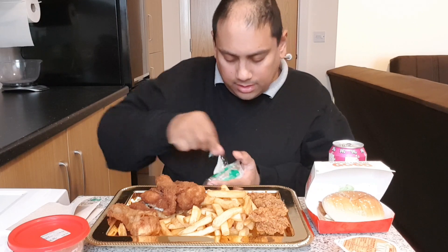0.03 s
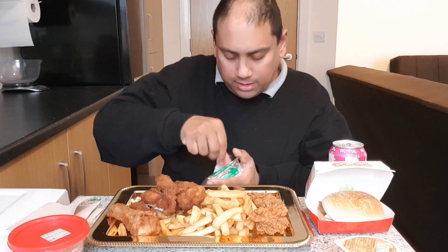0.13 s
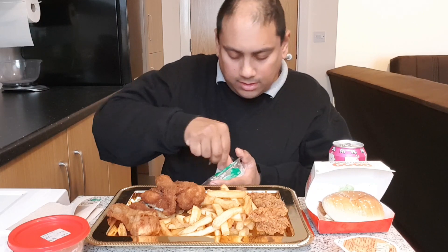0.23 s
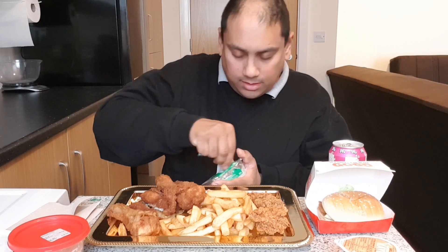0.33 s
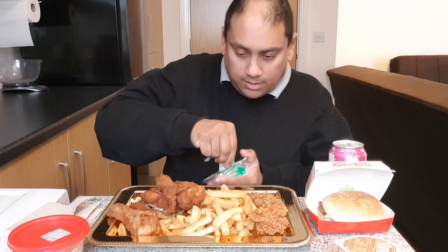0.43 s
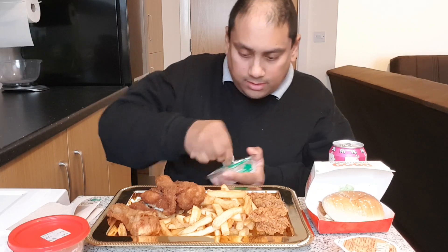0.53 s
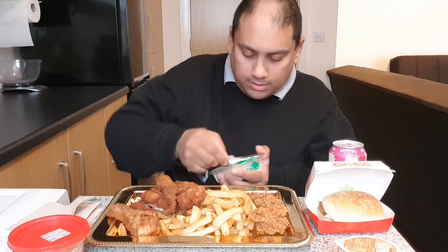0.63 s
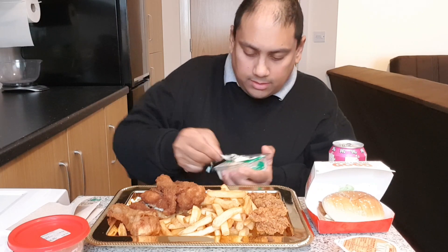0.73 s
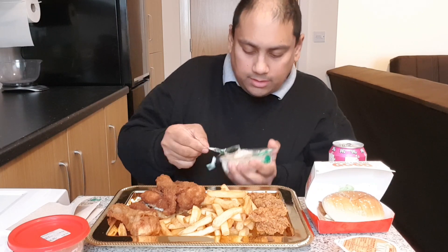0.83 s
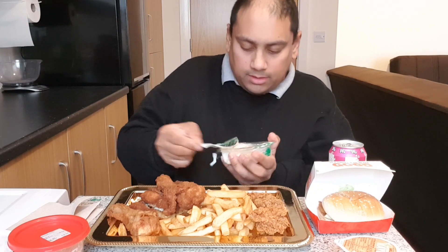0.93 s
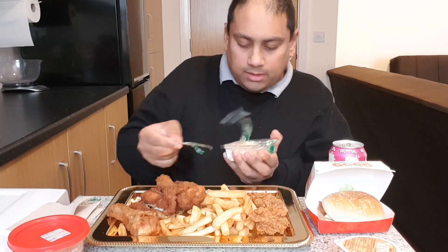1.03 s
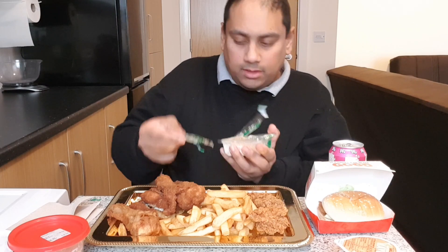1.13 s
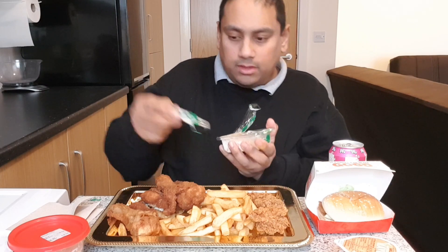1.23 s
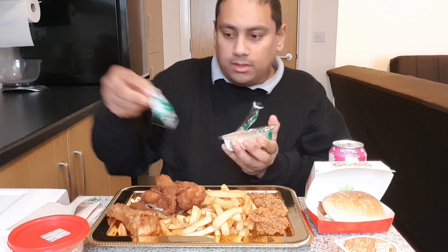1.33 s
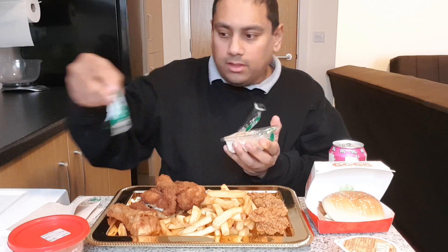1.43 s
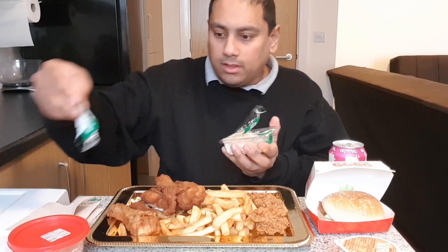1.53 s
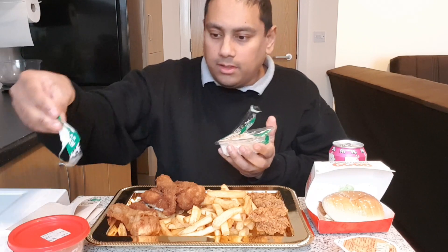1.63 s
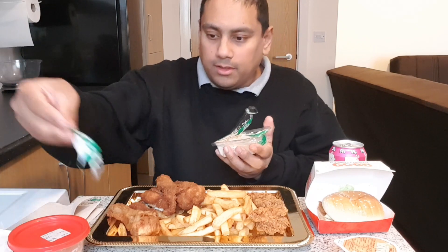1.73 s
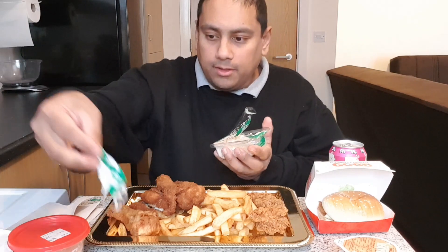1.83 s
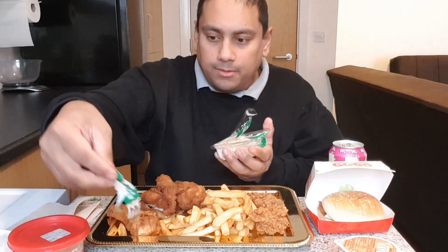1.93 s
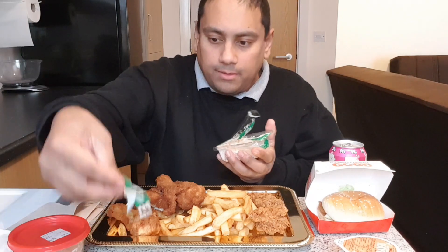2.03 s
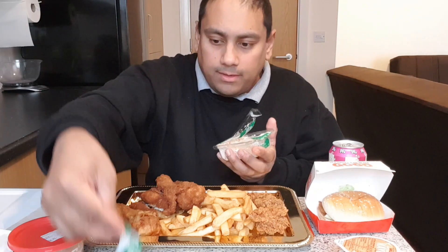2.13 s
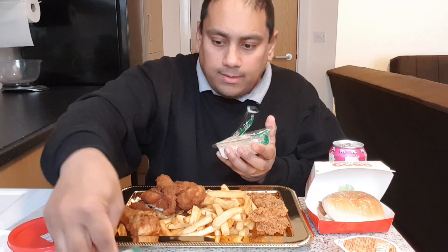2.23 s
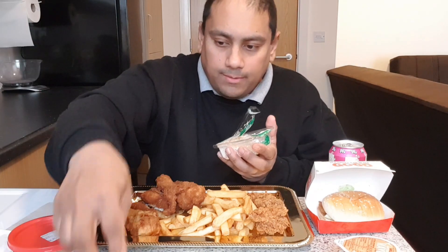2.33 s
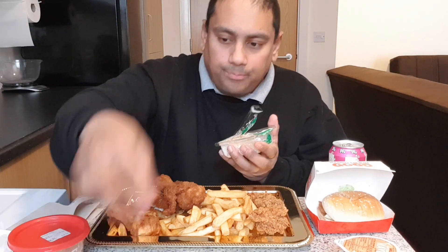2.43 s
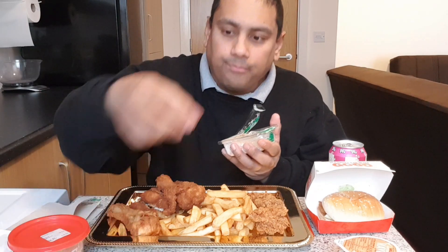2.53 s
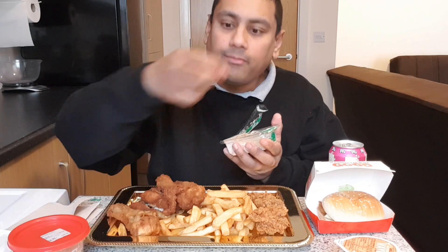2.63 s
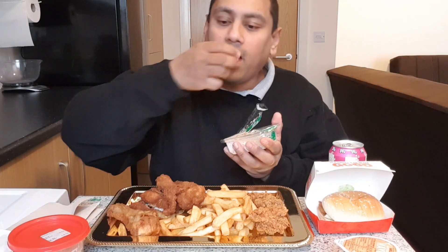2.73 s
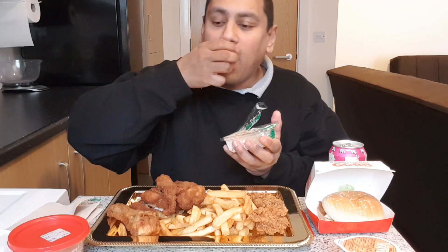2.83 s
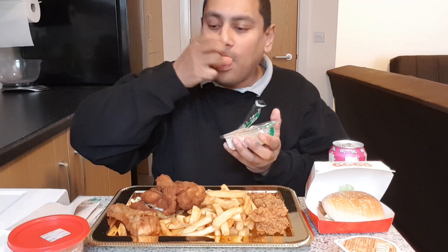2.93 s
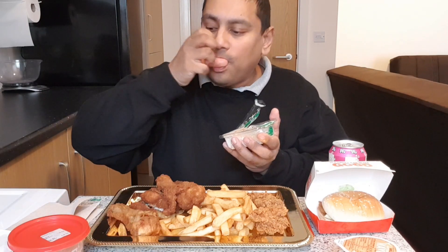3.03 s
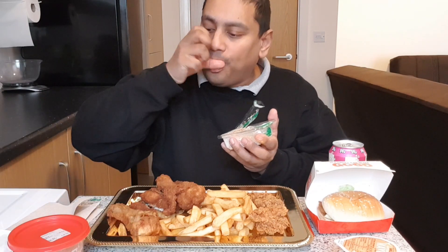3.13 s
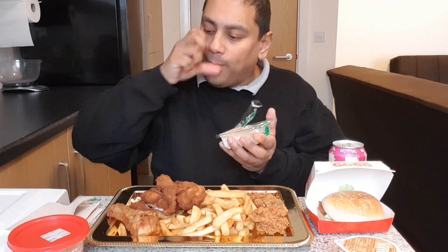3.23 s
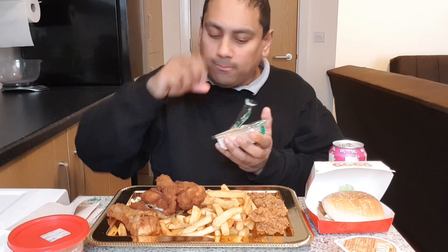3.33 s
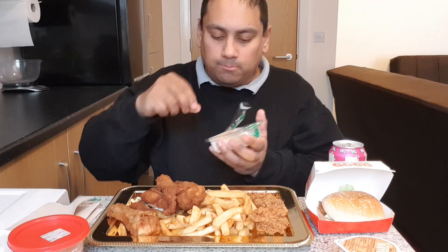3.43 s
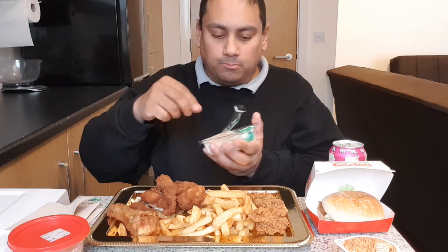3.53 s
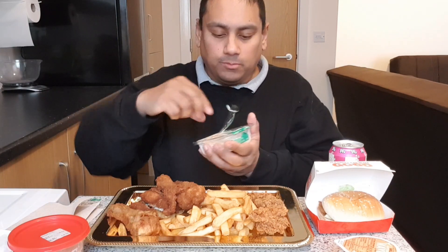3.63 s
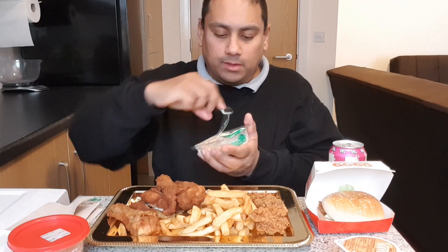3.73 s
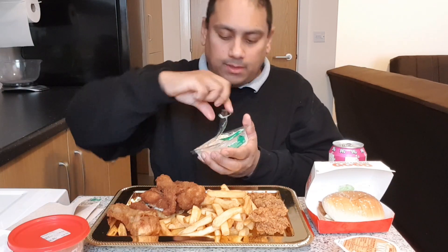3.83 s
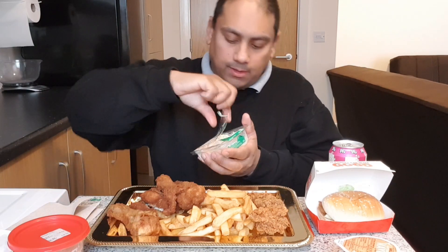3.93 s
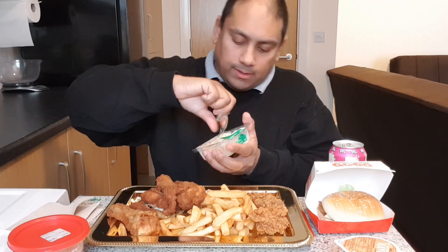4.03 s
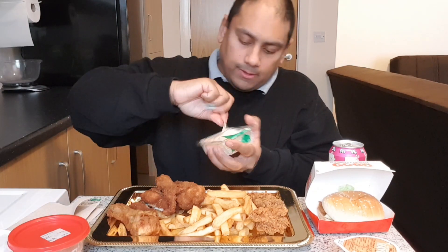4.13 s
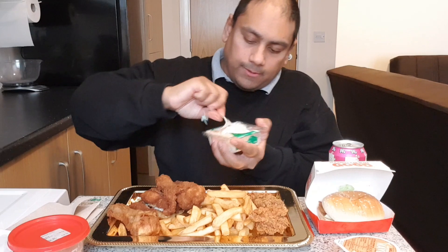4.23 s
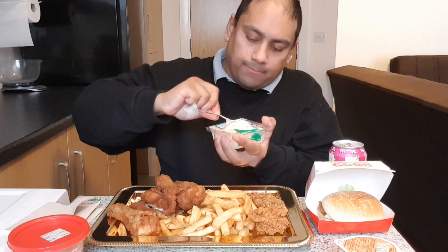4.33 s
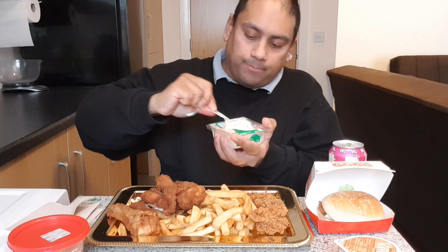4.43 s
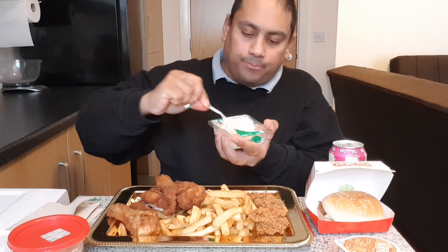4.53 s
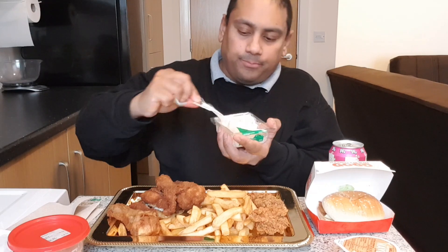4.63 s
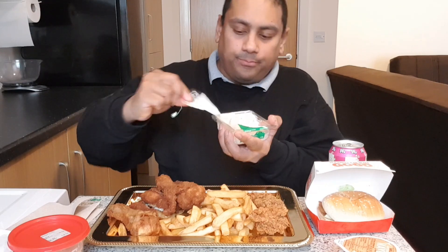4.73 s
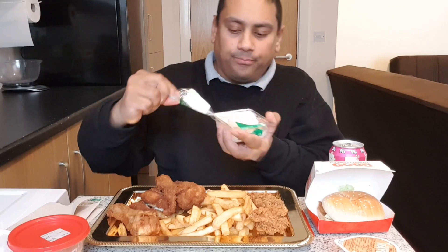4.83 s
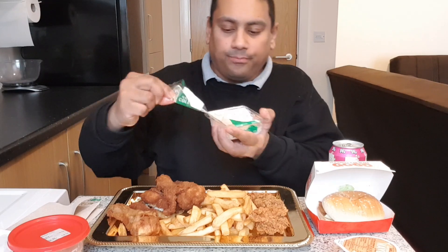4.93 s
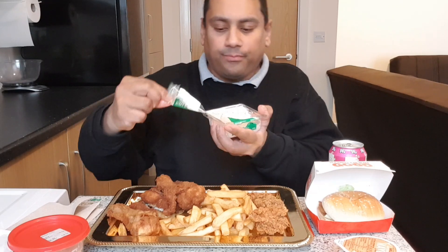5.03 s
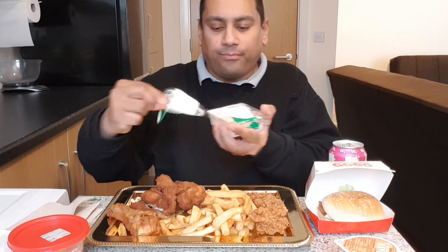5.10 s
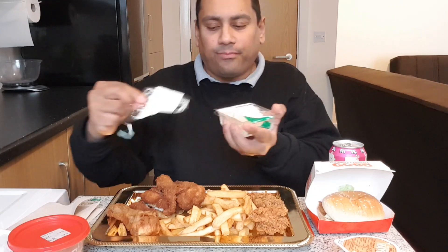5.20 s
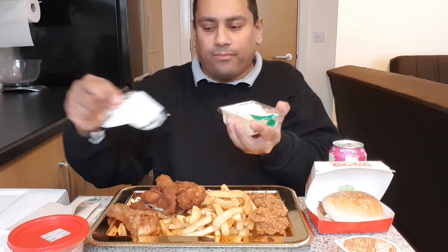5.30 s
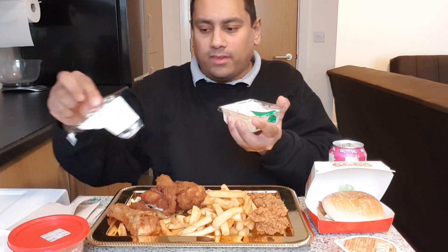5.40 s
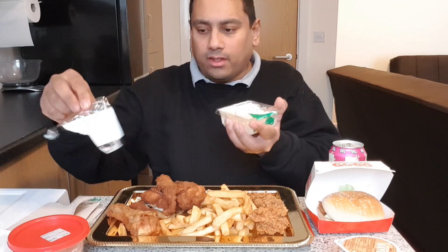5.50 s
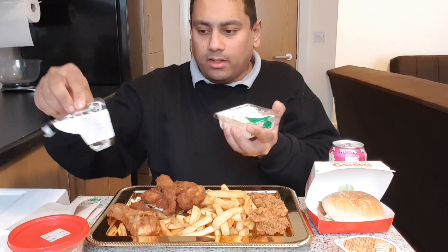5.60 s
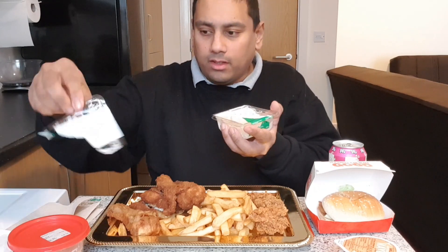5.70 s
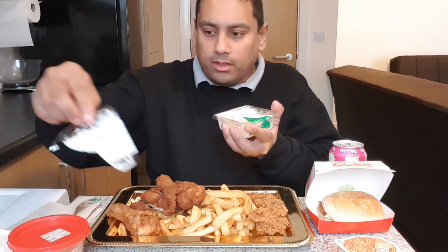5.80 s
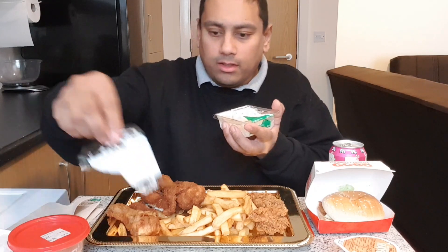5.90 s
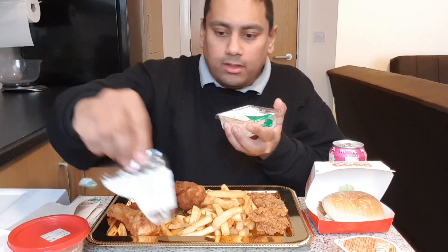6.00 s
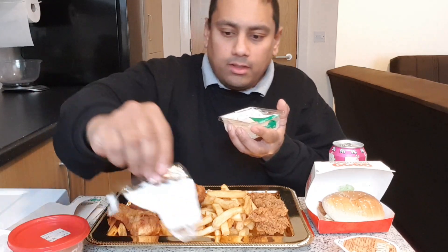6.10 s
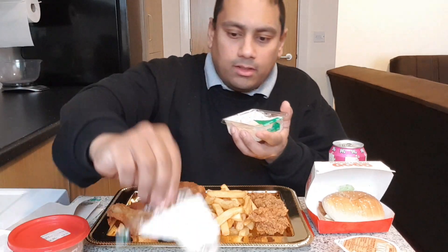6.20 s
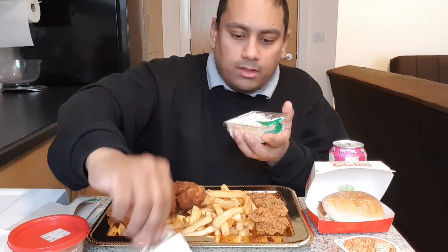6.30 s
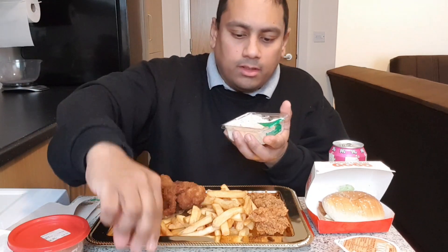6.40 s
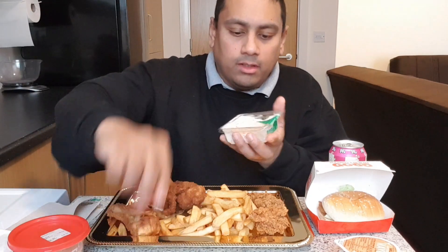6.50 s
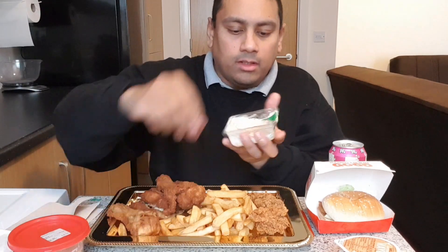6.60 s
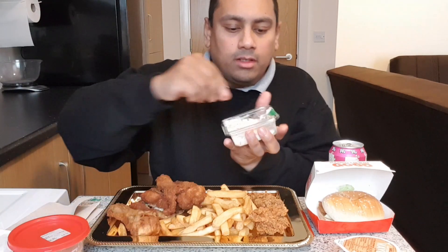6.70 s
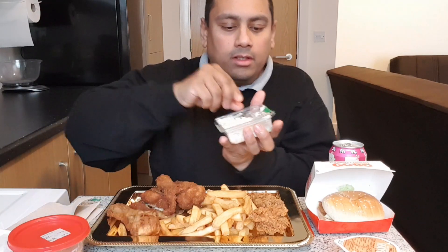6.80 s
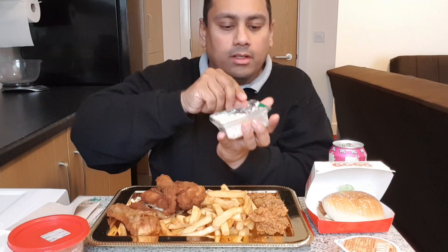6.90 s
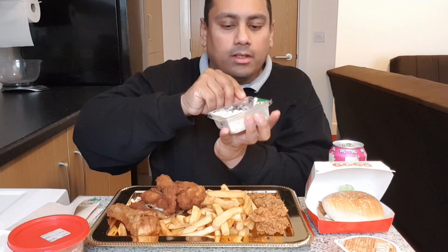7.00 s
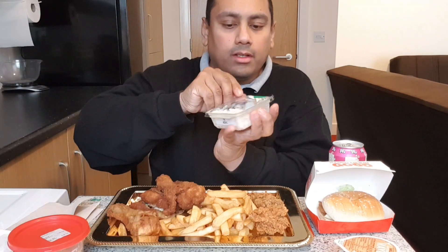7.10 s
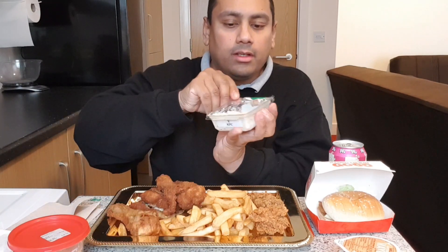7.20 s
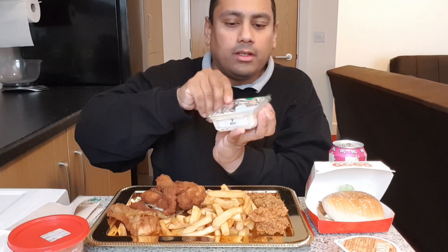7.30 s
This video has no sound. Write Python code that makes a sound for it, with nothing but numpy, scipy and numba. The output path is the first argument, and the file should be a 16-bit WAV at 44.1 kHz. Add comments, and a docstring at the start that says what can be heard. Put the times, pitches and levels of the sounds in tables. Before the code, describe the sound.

From the start until about 1 second, a strip of film lid is tugged off a small plastic dip tub, the seal giving in tiny cracks and a few sharp snaps that make the tub ring briefly. The loose strip crinkles in short bursts from 1.2 to 2 seconds. At about 2.2 seconds a hand bumps the table softly. Quiet wet smacks of a finger being licked come around 2.7 and 3.1 seconds. From 4 to 5 seconds the rest of the lid peels away in a brighter run of crackles and snaps. The freed film crinkles and ticks until it is laid down at about 6.3 seconds. Near 7 seconds the tub is handled faintly. Everything sounds fairly close, in a small echoing kitchen with a steady low hum and faint hiss.

```python
"""The film lid of a small plastic dip tub is peeled off in two pulls: first a strip, then the rest.
The seal gives way in many tiny cracks and a few snaps, which make the tub and the tight film ring.
The loose pieces crinkle and are laid down. Between the pulls, a hand bumps the kitchen table
and a finger is licked. A small, echoing room with a low hum surrounds it all."""
import sys
import numpy as np
from scipy import signal
from scipy.fft import rfft, irfft
from scipy.io import wavfile
from numba import njit

SR = 44100
rng = np.random.default_rng(int(sys.argv[2]) if len(sys.argv) > 2 else 0)


def store_pcm(level_fs):
    """Save levels as 16-bit WAV."""
    pcm = np.round(np.clip(level_fs, -1, 1) * 32767).astype(np.int16)
    wavfile.write(sys.argv[1], SR, np.atleast_2d(pcm).T)


N = 324267
T = np.arange(N) / SR
STRIP_OFF_S, LID_OFF_S = 1.15, 5.0  # when each piece has come free
DANGLE_START_S, DANGLE_END_S = 5.7, 6.3  # the lid hangs from the fingers
FILM_REST_HZ = 3000  # main ring of the loose film at rest

# The room's rumble and hiss. Each row: frequency in Hz, relative level in dB.
ROOM_NOISE_TONE = [(28, -39), (42, -5.5), (70, 4), (100, -5.5), (170, -7), (250, -12.5), (480, -15.5),
                   (630, -30.5), (1100, -32), (2000, -37), (4500, -39), (8000, -41), (10200, -29.5),
                   (16000, -32)]
# Rings of the hum and the tub (closed, then open), with the room's own low notes near 300 and 450 Hz,
# and of the table. Each row: pitch in Hz, width in Hz (wider dies away sooner), relative level in dB.
HUM_AND_ROOM = [(49.6, 4.7, -0.5), (77.6, 5.3, 2), (133.25, 4.4, 0.5), (297.1, 4.06, -3), (340.4, 15, -18),
                (446, 16, -18)]
CLOSED_TUB_AND_ROOM = [(54.2, 23, -1), (116.5, 23, -6.5), (304, 51, 1), (458, 36, 9.5), (550, 74, 6),
                       (833, 390, -3.5), (1162, 110, 7), (1354, 16, 8.5), (1569, 73, 8.5), (1731, 99, 3),
                       (2240, 67, -10.5)]
OPEN_TUB_AND_ROOM = [(52, 67, -2.5), (125, 34, -8), (264, 160, -6.5), (460, 99, -3.5), (751, 57, 2),
                     (960, 210, -3.5), (1470, 300, 6.5), (1584, 283, 6.5), (2500, 110, 5)]
TABLE_RINGS = [(61.4, 8.5, 6), (82, 17, 13), (138, 11.6, 6), (281, 34, 2), (480, 60, -3.5), (797, 110, -9)]
# Fingers tug the lid and, at the end, the open tub. Each row: start in seconds, length in seconds,
# seal crackle in dB, tub ring in dB, film ring in dB, film pitch in Hz.
FINGER_TUGS = [(0.047, 0.18, -58, -68.5, -60.5, 1320), (0.079, 0.063, -48, -60.5, -54, 1480),
               (0.272, .045, -53.5, -70.5, -57, 1380), (0.349, .05, -43, -58.5, -58, 1400),
               (0.407, 0.016, -29.5, -54, -30.5, 1670), (0.517, 0.059, -41, -51, -42.5, 1550),
               (0.573, 0.042, -37, -36.5, -39.5, 1330), (0.609, 0.087, -41, -59.5, -38.5, 1790),
               (0.699, 0.054, -35, -40, -32.5, 1550), (0.746, 0.028, -33.5, -33.5, -52, 1500),
               (0.774, 0.051, -33.5, -38, -69, 1470), (0.921, 0.024, -47.5, -43, -60, 1150),
               (0.941, 0.043, -35, -51, -48.5, 1090), (0.987, 0.024, -36.5, -69, -65, 1000),
               (3.742, 0.29, -99, -85, -73, 1500), (4.016, 0.091, -42, -49, -66.5, 1360),
               (4.136, 0.046, -47, -49.5, -68, 1340), (4.194, 0.088, -41.5, -48.5, -68, 1090),
               (4.298, 0.1, -39.5, -49, -48, 1010), (4.405, 0.043, -34.5, -41.5, -48.5, 3300),
               (4.454, 0.03, -37.5, -45, -48, 3620), (4.491, .09, -37.5, -46.5, -57.5, 3770),
               (4.594, 0.086, -36.5, -47, -43.5, 2700), (4.72, 0.039, -39.5, -44.5, -38, 2640),
               (4.733, 0.017, -34, -37.5, -34.5, 1920), (4.77, 0.031, -40, -39.5, -49, 490),
               (4.844, 0.091, -42, -52.5, -51.5, 2950), (6.958, 0.36, -81, -78, -67.5, 449),
               (7.088, 0.024, -61, -61, -76, 455)]
# The tone of the seal in each pull, a snap, each loose piece and the flapping sheet.
# Each row: frequency in Hz, relative level in dB.
STRIP_SEAL_TONE = [(250, -27), (450, 6.5), (1000, -3.5), (2300, 5), (3500, 4), (5000, 2.5), (7000, 0),
                   (9000, -1), (11000, 3), (13500, 1), (15800, -9)]
LID_SEAL_TONE = [(250, -27), (600, -1), (1000, 1), (2000, -2), (3200, 9.5), (4500, 6.5), (5600, 8.5),
                 (7000, 3.5), (9000, 4.5), (11500, 5.5), (13500, 1.5), (16000, -10.5)]
SNAP_TONE = [(300, -16), (900, -1.5), (2500, 6), (5000, 5), (7000, 3), (11000, 7.5), (13500, 4.5),
             (15800, -6.5)]
LOOSE_STRIP_TONE = [(1200, -30), (2500, -10.5), (2800, 7), (3050, 10), (3500, -4.5), (4800, -1.5),
                    (6200, 3), (7000, -4), (9000, 0), (11000, -2), (13300, -1), (15800, -12)]
LOOSE_LID_TONE = [(1000, -27), (1900, -16), (2450, 8.5), (2950, 15), (3500, -2), (4800, 6), (6200, 6.5),
                  (7200, 1), (9500, 4.5), (12500, 5), (15800, -8)]
FLAP_TONE = [(300, 0), (700, -12), (1000, 7), (1400, 2), (1750, 3.5), (2250, -3.5), (5000, 2), (12000, -12)]
# Bits of seal let go at once. Each row: start in seconds, crack in dB, film ring in dB, pitch in Hz.
SEAL_SNAPS = [(0.3553, -11, -4, 1440), (0.4123, 0.5, -10, 1450), (.575, -20, -3.5, 1340),
              (4.013, -19, -32, 2400), (4.1455, -10, -45.5, 2970), (4.193, -9.5, -34.5, 2950),
              (4.226, -5.5, -9.5, 1150), (4.302, -24, -11.5, 4700), (4.3706, -14.5, -16, 3960),
              (4.408, -3.5, 0.5, 3420), (4.5, -11, -3, 3700), (4.5502, -11.5, -5, 3700),
              (4.596, -4, -9.5, 3750), (4.7077, -1, -4.5, 5600), (4.7458, -5, -4.5, 3550)]
# Loose film buckles. Each row: start in seconds, build-up in seconds, level in dB, pitch in Hz.
FILM_CRINKLES = [(1.19, 0.018, -46.5, 2900), (1.472, 0.023, -42, 2850), (1.578, .016, -41, 2880),
                 (1.656, 0.021, -42.5, 2760), (1.689, 0.022, -46, 2700), (1.75, 0.013, -41.5, 2820),
                 (1.946, 0.016, -36.5, 3040), (2.19, 0.035, -61, 3010), (5.108, 0.026, -34.5, 2940),
                 (5.201, 0.022, -33.5, 3000), (5.293, 0.01, -41, 2850), (5.35, 0.0065, -44.5, 3000),
                 (5.468, 0.024, -53.5, 2900), (5.504, 0.013, -42.5, 3000), (5.576, 0.017, -30.5, 2980),
                 (5.601, 0.014, -39.5, 3000), (5.71, 0.062, -53, 2830), (5.94, 0.02, -41.5, 2750),
                 (6.238, .045, -44.5, 2900), (6.289, .032, -35, 2780), (6.333, .015, -40, 2530)]
# Small ticks: creases in the loose film, and one dull tap as the hand lands on the table.
# Each row: start in seconds, crack in dB, pitch in Hz.
SMALL_TICKS = [(2.169, -25.5, 1830), (2.241, -27, 790), (5.106, -10, 3000), (5.113, -7.5, 980),
               (5.204, -12, 3100), (5.299, -10, 2820), (5.314, -13.5, 10500), (5.3605, -17, 2980),
               (5.513, -9, 4960), (5.798, -24, 9000), (5.841, -16.5, 11700), (5.863, -31, 1710),
               (6.042, -23, 2900), (6.053, -20.5, 2880), (6.1447, -17.5, 3420), (6.204, -17.5, 3480),
               (6.23, -18, 4400), (6.308, -8.5, 2350), (6.3197, -8.5, 2075), (7.1548, -28.5, 6270)]
# The hand lands on the table. Each row: start in seconds, level in dB.
HAND_BUMPS = [(2.2, -50), (2.238, -46), (2.28, -57), (6.19, -81)]
# Wet smacks. Each row: start in seconds, build-up in seconds, level in dB, pitch in Hz, width in Hz.
LIP_SMACKS = [(2.453, 0.0039, -55.5, 3140, 1110), (2.678, 0.015, -40, 11700, 8120),
              (2.683, 0.016, -44, 5540, 3500), (2.716, 0.0073, -39, 7200, 7300),
              (2.719, 0.021, -43, 2450, 1390), (2.797, 0.018, -58.5, 1010, 900),
              (3.132, 0.011, -51.5, 6670, 10200), (3.148, 0.007, -38.5, 5900, 9100),
              (3.143, 0.029, -50.5, 1890, 2800)]
# Where the hands are. Each row: time in seconds, the right ear's head start in samples,
# echo level in dB (lower when the hands reach towards the listener).
HAND_PATH = [(.4, 0.5, 0), (1.7, 4, 2), (2.05, 4, 2.5), (2.8, 4, -2.5), (4.1, -1.5, -3.5), (4.7, 0.5, -.5),
             (5.2, 7.5, -2.5), (5.599, 4, -2.5), (6.2, 2, -8), (7.1, -1.5, 7.5)]


def gain(db):
    """Turn decibels into a number to multiply by."""
    return 10 ** (np.asarray(db) / 20)


def add(track, start_s, sound):
    """Mix a sound into a track at the given time."""
    i = max(int(start_s * SR), 0)
    track[i:i + len(sound)] += sound[:max(N - i, 0)]


def tone_gains(tone, hz):
    """Read a tone table at the given frequencies."""
    table_hz, db = np.transpose(tone)
    return gain(np.interp(np.log(hz + 1), np.log(table_hz), db))


def through(sound, response):
    """Play a sound through a response (how a thing answers one click), scaled to an energy of 1."""
    return signal.fftconvolve(sound, response / np.linalg.norm(response))[:N]


def tone_response(tone, size=1024):
    """A short click with the given tone."""
    cepstrum = irfft(np.log(tone_gains(tone, np.fft.rfftfreq(size, 1 / SR))))
    # folding the second half onto the first packs the energy at the start of the click
    cepstrum[1:size // 2] *= 2
    cepstrum[size // 2 + 1:] = 0
    return irfft(np.exp(rfft(cepstrum)))


def ring_response(rings, size=16384):
    """A tapped object rings as a sum of fading sine waves."""
    t = T[:size]
    return sum((-1) ** k * gain(db) * width * np.exp(-np.pi * width * t) * np.sin(2 * np.pi * hz * t)
               for k, (hz, width, db) in enumerate(rings))


@njit
def band_pass(sound, hz, width):
    """Keep the sound near one pitch; the pitch and the width may move."""
    out, band_state, low_state = np.empty(len(sound)), 0., 0.
    for i in range(len(sound)):
        step = np.tan(np.pi * min(hz[i], .45 * SR) / SR)
        damping = width[i] / hz[i]
        band = (band_state + step * (sound[i] + 1e-18 - low_state)) / (1 + step * (step + damping))
        band_state = 2 * band - band_state
        low_state += 2 * step * band
        out[i] = damping * band * (SR / np.pi / width[i] * 2) ** .25  # boost narrow bands
    return out


def ring(sound, hz, width):
    """Make a sound ring at one pitch by filtering it twice."""
    hz, width = hz * np.ones(len(sound)), width * np.ones(len(sound))
    return band_pass(band_pass(sound, hz, width), hz, width)


def cracks(per_s, spread_db, stick_db=0, stick_per_s=70):
    """Tiny cracks of uneven size at random moments; stick_db bunches them as film sticks and slips."""
    hits = rng.random(N) < per_s / SR
    slip_times = np.cumsum(rng.exponential(1 / stick_per_s, 2000))
    slip_db = stick_db * np.interp(T, slip_times, rng.uniform(-0.64, 1, len(slip_times)))
    signs = rng.choice([-1, 1], N)
    size_db = spread_db * np.clip(rng.standard_normal(N), -2, 2)
    clicks = hits * signs * gain(slip_db + size_db)
    return clicks / clicks.std()


def swell(start_s, rise_s, floor, release_s):
    """A loudness curve that climbs from floor to 1, then dies away."""
    t, out = T[:SR // 2], np.zeros(N)
    rise = floor + (1 - floor) * np.clip(t / rise_s, 0, 1) ** 2
    add(out, start_s, rise * np.exp(-np.clip((t - rise_s) / release_s, 0, 20)))
    return out


def stereo_spectrum(size, alike_hz):
    """The spectrum of noise at two ears: alike in the bass, unrelated in the treble."""
    hz = np.fft.rfftfreq(size, 1 / SR)
    mid, side = rfft(rng.standard_normal((2, size)))
    alike = .92 / (1 + (hz / alike_hz) ** 2)
    return hz, mid * np.sqrt(1 + alike) + np.array([[1], [-1]]) * side * np.sqrt(1 - alike)


def room_hum(noise_db=-58, hum_db=-58):
    """Low rumble, a hum with the room's own low notes, and faint hiss."""
    hz, spectrum = stereo_spectrum(N, alike_hz=860)
    noise = irfft(spectrum * tone_gains(ROOM_NOISE_TONE, hz), N)
    hum = through(rng.standard_normal(N), ring_response(HUM_AND_ROOM))
    return gain(noise_db) * noise / noise.std() + gain(hum_db) * hum


def peel(tugs, seal_tone, rings, per_s, width_share, attack_s, release_s, sag_db, pitch_rise=0.13):
    """Each tug unzips cracks that shake tub and film. It weakens as the film tightens and rings higher."""
    seal_cracks = cracks(per_s, spread_db=4, stick_db=3, stick_per_s=140)
    crackle, tub, film = np.zeros((3, N))
    for start_s, length_s, seal_db, tub_db, film_db, hz in tugs:
        run = seal_cracks[int(start_s * SR):][:SR // 2]
        t = T[:len(run)]
        progress = np.clip(t / length_s, 0, 1) - .5  # zero halfway through the tug
        fade_in = np.clip(t / attack_s, 0, 1)
        fade_out = np.exp(-np.clip((t - length_s) / release_s, 0, 20))
        run = run * fade_in * gain(-sag_db * progress) * fade_out
        add(crackle, start_s, gain(seal_db) * run)
        add(tub, start_s, gain(tub_db) * run)
        pitch = hz * (1 + pitch_rise * progress)
        add(film, start_s, gain(film_db) * ring(run, pitch, width_share * hz))
    return through(crackle, tone_response(seal_tone)) + through(tub, ring_response(rings)) + film


def pop(hz, crack_db, ring_db, tear_s, width_share, tear_share=0.45, size=2048):
    """A kick that tears on for a millisecond or two and rings at one pitch."""
    kick = signal.unit_impulse(size)
    tear = rng.standard_normal(size) * np.exp(-T[:size] / tear_s) * (1 - kick)
    force = np.sqrt(1 - tear_share) * kick + np.sqrt(tear_share) * tear / np.linalg.norm(tear)
    crack = through(force, tone_response(SNAP_TONE))[:size]
    return gain(crack_db) * crack + gain(ring_db) * ring(kick, hz, width_share * hz)


def seal_snaps(open_tub_db=-14):
    """Bits of seal pop off the rim and kick the tub, which answers far more while still closed."""
    film, closed, opened = np.zeros((3, N))
    for start_s, crack_db, ring_db, hz in SEAL_SNAPS:
        add(film, start_s, pop(hz, crack_db, ring_db, tear_s=0.0011, width_share=0.33))
        if start_s < STRIP_OFF_S:
            add(closed, start_s, [gain(crack_db)])
        else:
            add(opened, start_s, [gain(crack_db + open_tub_db)])
    closed_ring = through(closed, ring_response(CLOSED_TUB_AND_ROOM))
    open_ring = through(opened, ring_response(OPEN_TUB_AND_ROOM))
    return film + closed_ring + open_ring


def crinkles(bursts, film_tone, per_s, spread_db, flip_db, flap_db, release_s, size=8192):
    """Loose film flips, then a rush of creases builds to a second flip; the whole sheet flaps along."""
    out, clicks = np.zeros(N), cracks(per_s, spread_db)
    for start_s, rise_s, db, hz in bursts:
        first_flip = gain(flip_db) * swell(start_s, 0.0022, floor=0.63, release_s=0.00056)
        rush = swell(start_s, rise_s, floor=0.21, release_s=release_s)
        creases = gain(db) * (clicks * (first_flip + rush))[int(start_s * SR):][:size]
        curled_tone = np.array(film_tone) * [hz / FILM_REST_HZ, 1]  # each new curl shifts the pitch
        add(out, start_s, through(creases, tone_response(curled_tone)))
        add(out, start_s, gain(flap_db) * through(creases, tone_response(FLAP_TONE)))
    return out


def small_ticks(ring_offset_db=-10, stray_db=-68, sway_db=-62):
    """Film creases pop and the landing hand taps once; the dangling lid rustles and ticks faintly."""
    hanging = (T > DANGLE_START_S) * (T < DANGLE_END_S)
    stray = through(cracks(per_s=40, spread_db=4) * hanging, tone_response(SNAP_TONE))
    sway = through(cracks(per_s=400, spread_db=5) * hanging, tone_response(FLAP_TONE))
    out = gain(stray_db) * stray + gain(sway_db) * sway
    for start_s, db, hz in SMALL_TICKS:
        add(out, start_s, pop(hz, db, db + ring_offset_db, tear_s=0.0022, width_share=0.45))
    return out


def table_bumps():
    """The hand meets the table softly and shakes its low notes."""
    push = sum(gain(db) * swell(start_s, rise_s=0.013, floor=0.47, release_s=0.017)
               for start_s, db in HAND_BUMPS)
    return through(push * rng.standard_normal(N), ring_response(TABLE_RINGS))


def lip_smacks():
    """Thin layers of sauce and saliva break between fingers and lips."""
    out, clicks = np.zeros(N), cracks(per_s=3300, spread_db=5)
    for start_s, rise_s, db, hz, width in LIP_SMACKS:
        burst = clicks * swell(start_s, rise_s, floor=0.57, release_s=0.0037)
        out += gain(db) * ring(burst, hz, width)
    return out


def echoes(lead, echo_db, low_fade_s=0.32, high_fade_s=0.34, direct_db=-3, table_db=-13, size=16384):
    """Each ear hears the direct sound, a bounce off the table, then the ring of a small hard room."""
    t = T[:size]
    hz, spectrum = stereo_spectrum(size, alike_hz=804)
    low = 1 / (1 + (hz / 4000) ** 2)
    tail = sum(irfft(spectrum * share, size) * gain(-60 * t / fade_s)
               for share, fade_s in [(low, low_fade_s), (1 - low, high_fade_s)])
    tail *= 1 - np.exp(-t / 0.0004)  # the echoes build up quickly
    tail *= gain(echo_db) / np.linalg.norm(tail, axis=1, keepdims=True)
    tail[[0, 1], rng.integers(20, 90, 2)] += gain(table_db)
    lag = np.arange(size) - 6 - np.array([[lead], [-lead]]) / 2  # samples since reaching each ear
    # the film beams its treble forward, so the direct sound is brighter than the echoes
    direct = np.sinc(lag) - 0.22 * (np.sinc(lag - 1) + np.sinc(lag + 1))
    return tail + gain(direct_db) * direct


def kitchen(sound, block=8192):
    """The hands keep moving, so each moment of sound meets its own pattern of echoes."""
    out = np.zeros((2, N))
    times, leads, echo_dbs = np.transpose(HAND_PATH)
    for i in range(0, N, block):
        middle_s = (i + block / 2) / SR
        ears = echoes(np.interp(middle_s, times, leads), np.interp(middle_s, times, echo_dbs))
        for track, ear in zip(out, ears):
            add(track, i / SR, signal.fftconvolve(sound[i:i + block], ear))
    return out


def scene():
    """Both pulls, the handling around them, and the room."""
    strip_tugs = [row for row in FINGER_TUGS if row[0] < STRIP_OFF_S]
    lid_tugs = [row for row in FINGER_TUGS if row[0] > STRIP_OFF_S]
    strip = peel(strip_tugs, STRIP_SEAL_TONE, CLOSED_TUB_AND_ROOM,
                 per_s=2500, width_share=0.53, attack_s=0.0063, release_s=0.0027, sag_db=4.5)
    lid = peel(lid_tugs, LID_SEAL_TONE, OPEN_TUB_AND_ROOM,
               per_s=2400, width_share=0.27, attack_s=0.0069, release_s=0.0051, sag_db=5)
    loose_strip = crinkles([row for row in FILM_CRINKLES if row[0] < LID_OFF_S], LOOSE_STRIP_TONE,
                           per_s=2900, spread_db=7.5, flip_db=-8.5, flap_db=-6.5, release_s=0.0038)
    loose_lid = crinkles([row for row in FILM_CRINKLES if row[0] > LID_OFF_S], LOOSE_LID_TONE,
                         per_s=1300, spread_db=3, flip_db=-13, flap_db=-4.5, release_s=0.0036)
    handling = strip + lid + seal_snaps() + loose_strip + loose_lid + small_ticks() + lip_smacks()
    return kitchen(handling) + table_bumps() + room_hum()


def record(dry, top_hz=16100):
    """Cut away the very highest treble."""
    return signal.sosfilt(signal.ellip(10, .2, 80, top_hz, fs=SR, output="sos"), dry)


dry = scene()
out = record(dry)
store_pcm(out)
```